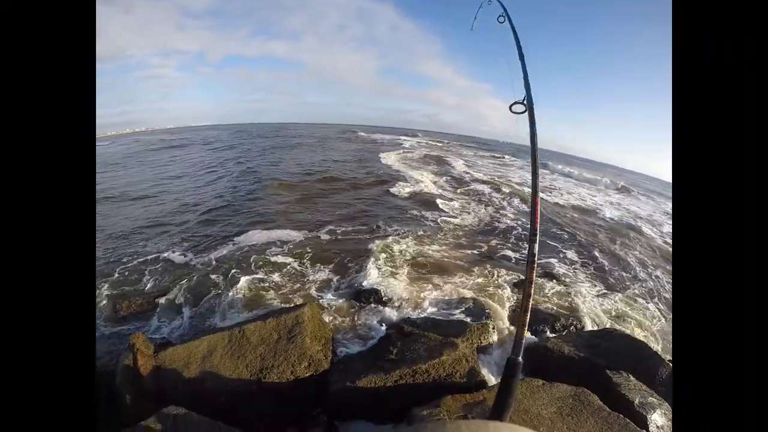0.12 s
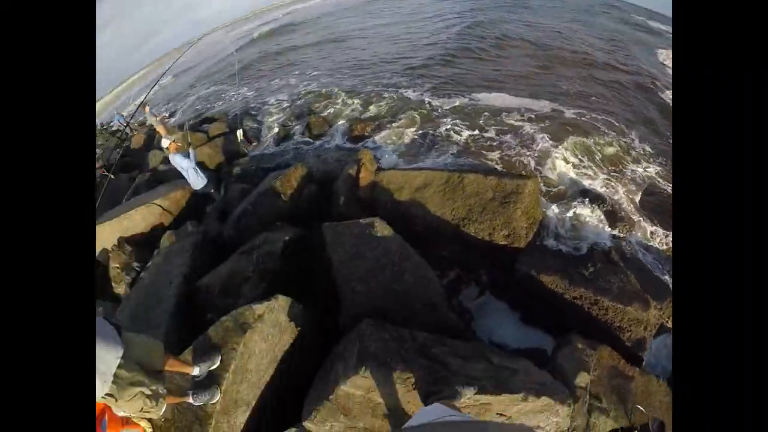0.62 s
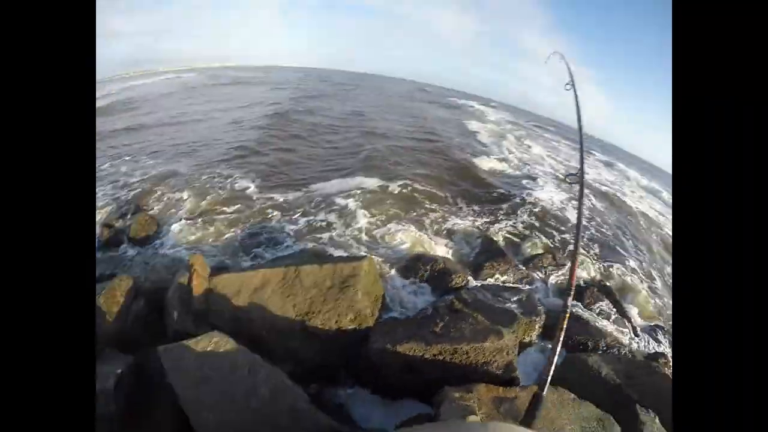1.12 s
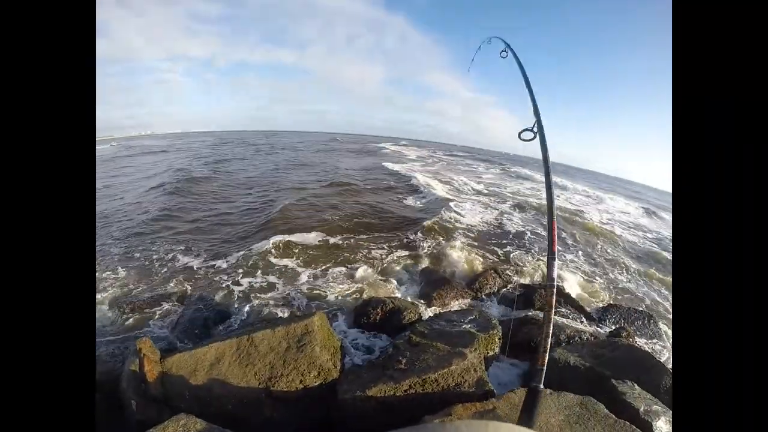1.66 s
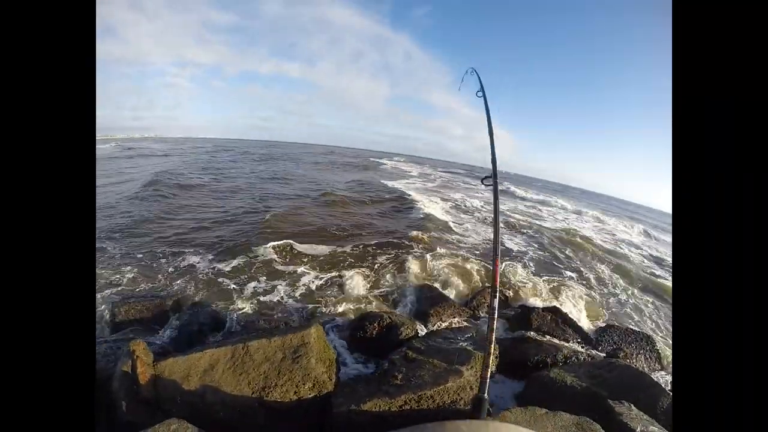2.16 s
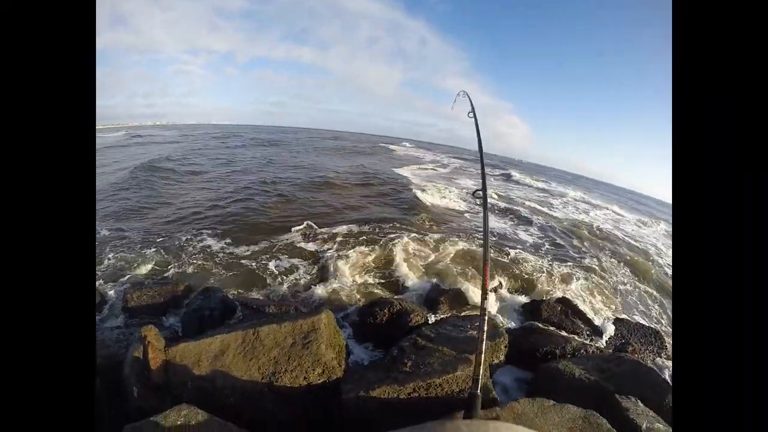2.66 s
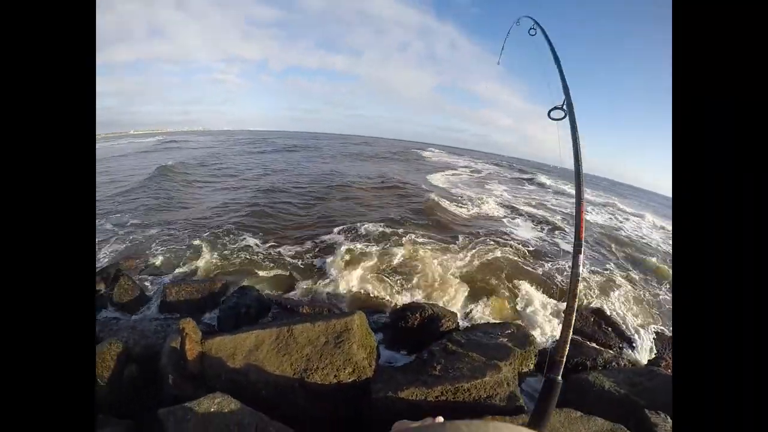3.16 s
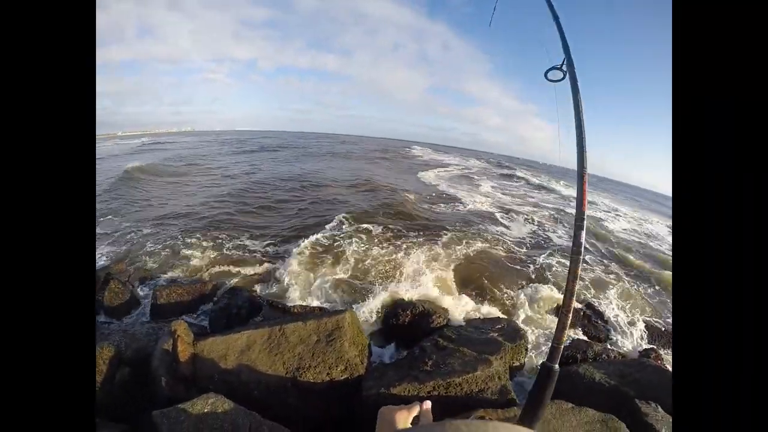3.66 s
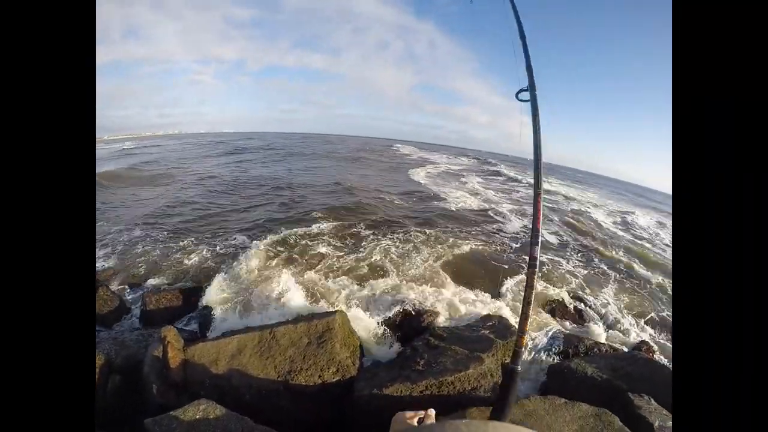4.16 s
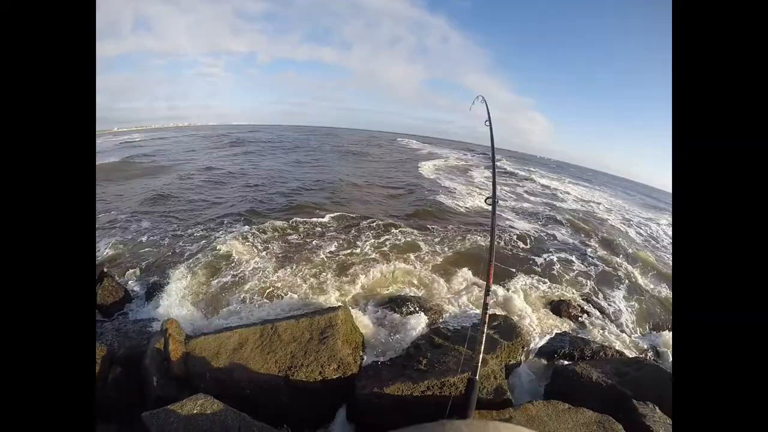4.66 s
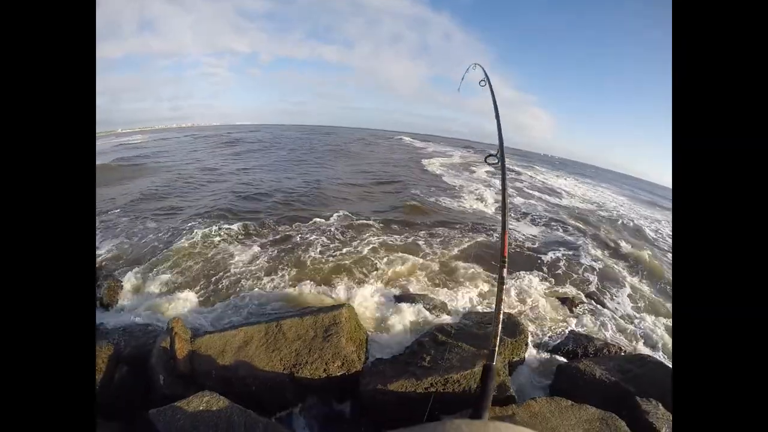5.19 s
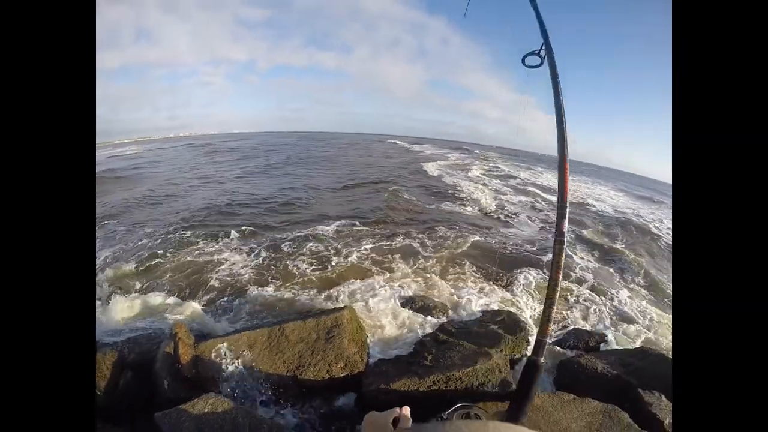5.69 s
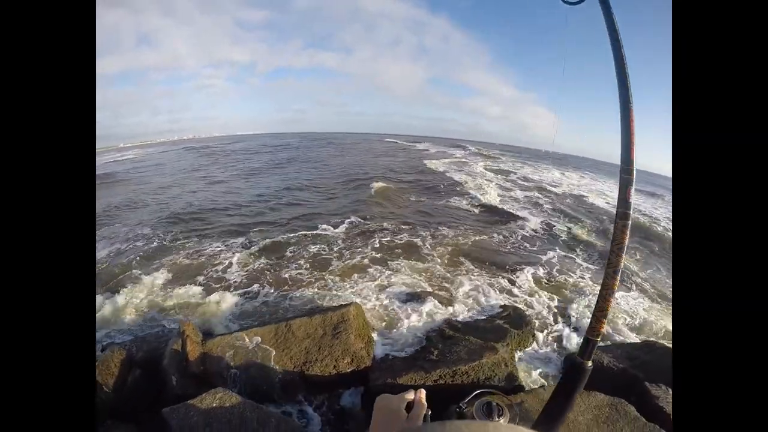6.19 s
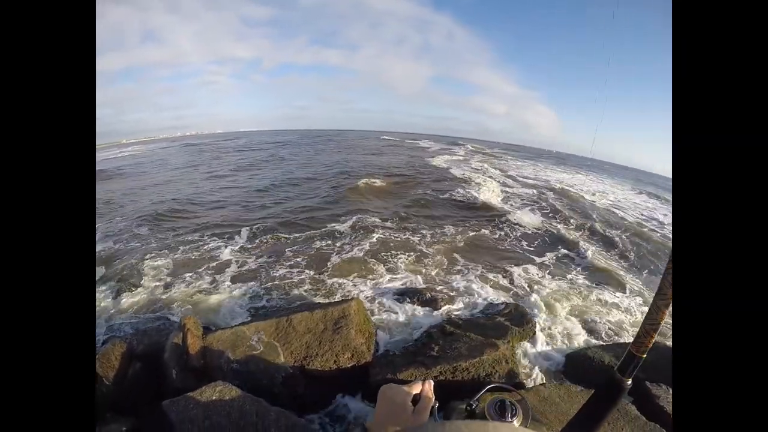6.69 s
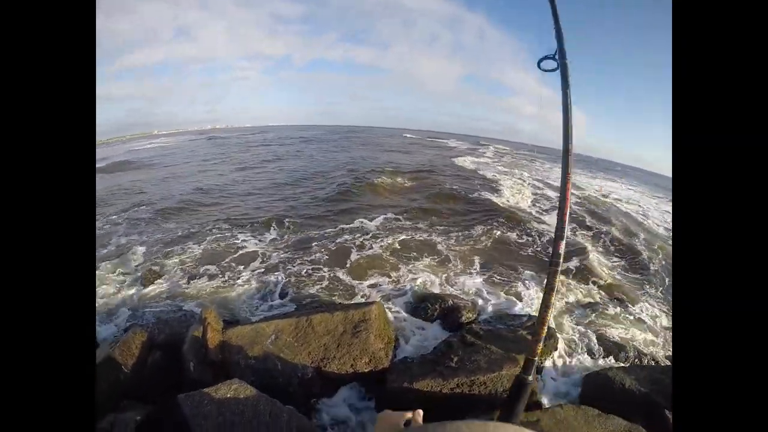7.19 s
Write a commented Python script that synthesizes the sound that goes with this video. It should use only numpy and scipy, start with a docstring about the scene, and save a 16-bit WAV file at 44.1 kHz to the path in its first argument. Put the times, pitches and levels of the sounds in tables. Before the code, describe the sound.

Outdoors on a rocky shore, a microphone inside a plastic housing picks up steady churning water with resonant, papery colour and faint hiss. Irregular deep gusts bump the case. Tiny squeaky chirps from a fishing reel appear in two clusters, low gulps of water between rocks. The surf grows, peaks past the middle, thins out, then one scratchy rising squeak closes it.

```python
"""Surf breaks and drains over jetty rocks throughout, heard through a camera's sealed plastic case.
Noise bands make rumble, slosh and foam; lumpy low noise is the wind buffeting the case; hiss is steady.
The camera tips down at 0.45-1.13 s; gliding tones are reel chirps at 0.6-2.2 s and 4.2-4.7 s, and a few
water gulps from 1.1 s to 4.7 s. The treble drops out briefly near 0.4, 0.8, 2.1, 2.4 and 6.4-6.8 s.
From 6.9 s the reel squeals once, a stick-slip tone of three rising partials."""
import sys
import numpy as np
from scipy import signal
from scipy.io import wavfile
from scipy.ndimage import uniform_filter1d

SR = 44100
rng = np.random.default_rng(int(sys.argv[2]) if len(sys.argv) > 2 else 0)


def waveform_to_disk(signal):
    """Save audio, clipped to [-1, 1], as 16-bit WAV at the path in sys.argv[1]."""
    frames = np.transpose(np.atleast_2d(signal))
    scaled = np.clip(frames, -1, 1) * 32767
    samples = np.round(scaled).astype(np.int16)
    wavfile.write(sys.argv[1], SR, samples)


def magnitude_from_level(level_db):
    """Linear magnitude for a level in decibels (20 dB per decade)."""
    exponent = np.asarray(level_db, float) / 20
    return 10 ** exponent


N = 323076


def evened(x):
    """Scales to rms 1."""
    return x / np.sqrt(np.mean(x ** 2) + 1e-20)


def column(table, index, t):
    """Interpolates one column of a curve at times t."""
    return np.interp(t, [row[0] for row in table], [row[index] for row in table])


def bump(middle, width, x):
    """Bell-shaped rise and fall; width is between the 1/e points."""
    return np.exp(-(2 * (x - middle) / width) ** 2)


def noise(colour, size, patchy_db, patch_hz, patch_s, flicker_db, shape_db=lambda hz, t: 0):
    """Random short-time spectra with drifting patches and a flicker shared by all pitches."""
    hop = size // 4
    hz = np.fft.rfftfreq(size, 1 / SR)[:, None]
    t = np.arange(N // hop + 5) * hop / SR
    real, imaginary, patches = rng.standard_normal((len(t), len(hz), 3)).T
    patch_frames = 1 + int(patch_s * SR / hop)
    patches = uniform_filter1d(patches, 1 + int(patch_hz * size / SR), 0)
    patches = evened(uniform_filter1d(patches, patch_frames, 1))
    flicker = evened(uniform_filter1d(rng.standard_normal(len(t)), patch_frames))
    colour_hz, colour_db = np.transpose(colour)
    base_db = np.interp(np.log(hz + 1), np.log(colour_hz), colour_db)
    field_db = base_db + patchy_db * patches + flicker_db * flicker
    rms = np.sqrt(np.mean(magnitude_from_level(field_db) ** 2))  # taken before shape_db, which thus sets the level
    spectra = (real + 1j * imaginary) * magnitude_from_level(field_db + shape_db(hz, t)) / rms
    return signal.istft(spectra, nperseg=size, noverlap=size - hop)[1][:N] / np.sqrt(3 * size / 4)


def gliding_tones(rows, waver):
    """Short gliding sines with soft ends; waver is the rms pitch jitter as a fraction."""
    out = np.zeros(N)
    jitter = evened(uniform_filter1d(rng.standard_normal(N), size=150))
    for start_s, length_s, start_hz, end_hz, db in rows:
        start, count = int(start_s * SR), int(length_s * SR)
        hz = np.linspace(start_hz, end_hz, count) * (1 + waver * jitter[start:][:count])
        tone = np.sin(2 * np.pi * np.cumsum(hz) / SR)
        out[start:][:count] += np.sqrt(2) * magnitude_from_level(db) * tone * np.hanning(count)
    return out


# Microphone noise spectrum. Each row: frequency in Hz, relative density in dB per Hz.
HISS_COLOUR = [(4000, -32), (8000, -6), (12000, -1.5), (15500, -1.5)]
HISS_DB = -71.5


def hiss():
    """Steady broadband noise of the microphone."""
    raw = noise(HISS_COLOUR, size=512, patchy_db=0.8, patch_hz=900, patch_s=0.02, flicker_db=1.0)
    return magnitude_from_level(HISS_DB) * evened(raw)


# Slowly changing wind under the gusts. Each row: time in seconds, level in dB, sharpness in dB per octave.
SLOW_WIND = [(0, -29, -5), (.35, -41, 1), (.6, -38.5, -1.7), (1.3, -32.5, -3.5), (1.6, -31.5, -2),
             (2.05, -34.5, -0.3), (2.4, -35.5, -1.5), (3, -30.5, 2), (3.4, -36.5, -0.2), (3.8, -33.5, 1.5),
             (4.25, -38, 4), (4.9, -34, 4), (5.25, -37, 2.5), (5.6, -33, -0.3), (6, -32.5, -0.5),
             (6.4, -40.5, -1.5), (6.8, -41, 5.5), (7.05, -28, 3.5), (7.33, -31, -0.5)]
# Gusts thumping the case. Each row: peak in seconds, length in seconds, level in dB.
GUSTS = [(0.093, 0.092, -24), (0.348, 0.072, -32.5), (0.535, 0.16, -27), (0.711, 0.036, -25.5),
         (0.847, .1, -28.5), (0.985, 0.042, -20), (1.158, 0.093, -23), (1.418, .06, -24.5),
         (1.636, 0.19, -31), (2.193, 0.093, -26), (2.313, 0.12, -26.5), (2.5, 0.11, -22), (2.697, .06, -31),
         (2.97, 0.075, -29.5), (3.18, 0.044, -28.5), (3.386, 0.041, -33), (3.848, 0.047, -30),
         (3.98, .06, -28.5), (4.1, .07, -34), (4.42, 0.04, -28.5), (4.516, 0.048, -28.5), (4.66, .1, -29),
         (4.926, 0.061, -26.5), (5.06, 0.17, -32), (5.336, .07, -23), (5.41, 0.054, -24.5),
         (5.547, 0.13, -25), (5.723, .06, -36.5), (5.928, 0.082, -30), (6.125, 0.055, -27.5),
         (6.26, 0.055, -38), (6.477, .1, -36), (6.74, 0.045, -33.5), (7.05, 0.03, -26), (7.193, .08, -29.5)]


def wind_db(t):
    """Powers of slow wind and gusts add."""
    power = magnitude_from_level(column(SLOW_WIND, 1, t)) ** 2
    power = power + sum(magnitude_from_level(db) ** 2 * bump(s, length_s, t) ** 2 for s, length_s, db in GUSTS)
    return 10 * np.log10(power)


# Wind pressure spectrum. Each row: frequency in Hz, relative density in dB per Hz.
WIND_COLOUR = [(8, -6), (20, 2), (45, -0.5), (80, -9), (150, -22.5), (400, -77), (3000, -130)]
USUAL_WIND_DB = -31.5
DULLING = -0.35  # dB per octave for each dB of wind above the usual


def wind(t, steadied=0.75):
    """Lumpy pressure on the case; the gusts, more than chance, set its strength."""
    def shape_db(hz, s):
        tilt = column(SLOW_WIND, 2, s) + DULLING * (wind_db(s) - USUAL_WIND_DB)
        return tilt * np.clip(np.log2((hz + 1) / 35), -1, 2)

    lumps = evened(noise(WIND_COLOUR, size=4096, patchy_db=0.5, patch_hz=30, patch_s=0.08,
                         flicker_db=1.2, shape_db=shape_db))
    power = uniform_filter1d(uniform_filter1d(lumps ** 2, size=1500), size=1500)
    # dividing by a power of the smoothed power flattens chance swells
    return magnitude_from_level(wind_db(t)) * evened(lumps / (power + 0.09) ** (steadied / 2))


# Reel chirps. Each row: start in seconds, length in seconds, start in Hz, end in Hz, mid-tone rms in dB.
CHIRPS = [(.6, .025, 2260, 2220, -52), (.672, 0.055, 1360, 1330, -51), (.81, 0.037, 1286, 1250, -48),
          (.818, 0.026, 2280, 2340, -48), (.864, 0.039, 2300, 2250, -51), (1.338, 0.033, 1740, 1750, -54),
          (1.773, .03, 4990, 4960, -58), (1.828, 0.055, 4950, 5030, -56), (1.95, 0.027, 1860, 1960, -55),
          (1.964, 0.036, 2260, 2270, -51), (1.988, 0.046, 1670, 1500, -48), (2.018, 0.058, 1390, 1220, -48),
          (2.072, 0.023, 1350, 1370, -47), (2.037, 0.027, 3960, 3940, -47.5),
          (2.138, 0.035, 2250, 2220, -48), (2.194, 0.032, 2500, 2470, -51), (2.2, .035, 1290, 1340, -45),
          (2.17, 0.028, 2260, 2260, -54), (1.93, 0.037, 2470, 2630, -53), (4.214, .035, 1810, 1820, -52),
          (4.274, 0.044, 2530, 2530, -45.5), (4.358, 0.033, 2190, 2170, -49),
          (4.565, .045, 1305, 1420, -51), (4.59, 0.044, 1430, 1260, -55), (4.644, 0.027, 2860, 2840, -54),
          (4.66, .03, 1290, 1310, -45)]


def chirps():
    """The reel chirps while wound: short, unsteady gliding tones."""
    return gliding_tones(CHIRPS, waver=0.036)


# Long squeal. Each row: time in seconds, slip rate in Hz, grip in dB.
SQUEAL = [(6.945, 782, -70), (6.962, 880, -51), (6.975, 1120, -46), (6.993, 1400, -52), (7.004, 1534, -46),
          (7.018, 1740, -48), (7.035, 1860, -44), (7.06, 1870, -57), (7.08, 1770, -55), (7.1, 1820, -62),
          (7.115, 1850, -55), (7.14, 1870, -60), (7.155, 2170, -50), (7.172, 2225, -48), (7.185, 2200, -58),
          (7.21, 2330, -49), (7.222, 2210, -52), (7.236, 2215, -50), (7.25, 2370, -51), (7.272, 2325, -47),
          (7.29, 2480, -54), (7.3, 2600, -68)]
# Brief slip inside the squeal. Each row: time in seconds, slip rate in Hz, grip in dB.
SLIP = [(7.035, 2060, -70), (7.052, 2120, -43), (7.068, 2150, -70)]
# Response of the reel's body. Each row: frequency in Hz, gain in dB.
REEL_COLOUR = [(800, -20), (1500, 0), (1900, 0), (2250, -14), (2450, -9), (2800, 0), (3150, -16),
               (3700, -14), (4400, 2), (5000, 1), (5400, -9), (6700, 0), (7800, -8)]
# Gains of partials 1 to 3 in dB.
PARTIAL_DB = (0, -3, -21)


def squeal(rows, t, waver=0.016, grain_db=3.5):
    """Stick and slip at an unsteady rate and grip sounds three partials through the reel's body."""
    jitter, *grain = (evened(uniform_filter1d(v, size=200)) for v in rng.standard_normal((4, N)))
    slip_hz, grip_db = column(rows, 1, t), column(rows, 2, t)
    body_hz, body_db = np.transpose(REEL_COLOUR)
    turns = np.cumsum(slip_hz * (1 + waver * jitter)) / SR
    out = np.zeros(N)
    for k in range(3):
        through_body_db = np.interp(np.log((k + 1) * slip_hz), np.log(body_hz), body_db)
        db = grip_db + PARTIAL_DB[k] + through_body_db + grain_db * grain[k]
        out += np.sqrt(2) * magnitude_from_level(db) * np.sin(2 * np.pi * (k + 1) * turns)
    return out * ((t > rows[0][0]) & (t < rows[-1][0]))


# Low water gulps. Each row: start in seconds, length in seconds, start in Hz, end in Hz, mid-tone rms in dB.
GULPS = [(1.147, .06, 620, 554, -51), (1.195, 0.072, 514, 415, -45.5), (3.16, 0.11, 135.3, 132, -30),
         (3.94, 0.061, 229, 215, -37), (4.57, .08, 219, 212, -35)]


def gulps():
    """Low gulps of water: short, unsteady gliding tones."""
    return gliding_tones(GULPS, waver=0.064)


# The wave. Each row: time in seconds, strength in dB, share of foam against heavy water in dB,
# foam brightness in dB per octave.
SURF = [(0, -3, 0, 2), (.35, -4.5, -0.5, .9), (.6, -3, -0.5, 1), (.9, -1.5, -0.5, -0.2),
        (1.12, -2, 0.5, -0.5), (1.26, -1.7, 0, 2), (1.5, -1, -0.5, 1), (1.9, -2, 0.5, 1),
        (2.1, -1, .5, -0.7), (2.4, 0.8, 1.5, -0.5), (2.9, 1, 1, 0.3), (3.3, 0.5, 1.1, 0.3),
        (3.7, .5, 0.2, 1.1), (4.2, 1.5, 1, 0.8), (4.6, 4, 0.5, 0.2), (5, 0.5, 0.5, 2.1),
        (5.25, 1.5, -1, 1.6), (5.55, -3.5, -1, 2), (5.9, -1.5, -1.5, 3), (6.4, -3, -1, 2),
        (6.8, -5, -1.5, 2), (7.33, -2.5, -2, 0)]
# Brief swells and dips of the surf. Each row: middle in seconds, length in seconds, change in dB.
SWELLS = [(1.215, 0.054, 4.5), (1.383, 0.13, 2), (2.017, 0.12, 1.5), (2.987, 0.046, 1.5),
          (3.742, 0.074, 1.5), (3.96, 0.072, 7), (4.6, 0.061, 2.5), (5.108, 0.038, 5), (2.5, 0.17, 1),
          (2.88, .08, 1.5), (3.183, .08, -0.5), (4.305, 0.089, -1), (5.76, 0.16, 1), (6.21, 0.047, 2.5),
          (6.388, 0.045, 2.5), (6.69, 0.06, 3)]
# levels at zero strength and foam share, foam and slosh before the wash gain and colouring
RUMBLE_DB, SLOSH_DB, FOAM_DB = -36, -47, -49
RUMBLE_FOLLOWS, SLOSH_FOLLOWS = 0.93, 0.54  # dB per dB of strength
RUMBLE_YIELDS, SLOSH_YIELDS = -1.86, 0.015  # dB per dB of foam share
SWELL_IN_FOAM = 0.13  # dB per dB of swell


def surf_db(t):
    """Rumble, slosh and foam levels follow the wave and its brief swells; foam tilt follows the wave."""
    strength, foamy = column(SURF, 1, t), column(SURF, 2, t)
    swell = sum(db * bump(s, length_s, t) for s, length_s, db in SWELLS)
    rumble_db = RUMBLE_DB + RUMBLE_FOLLOWS * strength + RUMBLE_YIELDS * foamy + swell
    slosh_db = SLOSH_DB + SLOSH_FOLLOWS * strength + SLOSH_YIELDS * foamy + swell
    foam_db = FOAM_DB + strength + foamy + SWELL_IN_FOAM * swell
    return rumble_db, slosh_db, foam_db, column(SURF, 3, t)


# Rumble spectrum. Each row: frequency in Hz, relative density in dB per Hz.
RUMBLE_COLOUR = [(30, -37), (70, -6.5), (130, 0), (250, -6), (400, -18), (600, -32), (1500, -67),
                 (6000, -120)]


def rumble(t):
    """Dull roar of water falling between the rocks."""
    roar = noise(RUMBLE_COLOUR, size=2048, patchy_db=0.73, patch_hz=80, patch_s=0.089, flicker_db=1.12)
    return magnitude_from_level(surf_db(t)[0]) * evened(roar)


# Peaks and notches of the sealed case. Each row: frequency in Hz, width in Hz, gain in dB.
CASE = [(987, 370, 7), (936, 100, 2), (2470, 124, -3.5), (1766, 305, -4.5), (2500, 530, 9),
        (3040, 180, -1.5), (3297, 500, 4.5), (3500, 240, -6.5), (3880, 550, 7), (4536, 445, 6),
        (5676, 750, 8), (6230, 250, 2.5), (6930, 990, 7), (8440, 720, -0.5), (10480, 1500, 4),
        (11260, 500, -4), (12500, 1100, 1)]


def case_db(hz):
    """Colour of the case: bell-shaped peaks and notches."""
    return sum(db * bump(f, width_hz, hz) for f, width_hz, db in CASE)


# Wash colour while tipped. Each row: frequency in Hz, width in Hz, gain in dB.
TIPPED_COLOUR = [(1750, 600, 3.5), (2900, 520, 2), (4450, 1500, -4.5)]
TIP_START_S, TIP_END_S, TURN_S = 0.45, 1.13, 0.14


def tipped_db(hz, t):
    """Tipping the camera toward the rocks shades some of the wash and opens other parts."""
    down = np.clip(np.minimum(t - TIP_START_S, TIP_END_S - t) / TURN_S + 0.5, 0, 1)
    return down * sum(db * bump(f, width_hz, hz) for f, width_hz, db in TIPPED_COLOUR)


# Wash spectrum. Each row: frequency in Hz, relative density in dB per Hz.
WASH_COLOUR = [(150, 5), (400, -2.5), (1000, 1), (2500, -5.5), (4800, -8), (5400, -21), (8000, -19),
               (9000, -24), (15500, -31)]


def wash():
    """Slosh below and bursting foam above, both heard through the case."""
    def shape_db(hz, s):
        octaves = np.log2((hz + 1) / 1700)
        foam = np.clip(octaves / 4.8 + 0.5, 0, 1)
        _, slosh_db, foam_db, tilt_db = surf_db(s)
        water_db = (1 - foam) * slosh_db + foam * foam_db
        bright_db = tilt_db * np.clip(octaves - 1.1, 0, 1.5)
        return case_db(hz) + tipped_db(hz, s) + water_db + bright_db

    return magnitude_from_level(4.5) * noise(WASH_COLOUR, size=1024, patchy_db=1.0, patch_hz=500, patch_s=0.04,
                            flicker_db=0.12, shape_db=shape_db)


def scene():
    """Hiss, wind, reel and surf in one channel."""
    t = np.arange(N) / SR
    reel = chirps() + squeal(SQUEAL, t) + squeal(SLIP, t)
    surf = gulps() + rumble(t) + wash()
    return (hiss() + wind(t) + reel + surf)[None]


# Treble dropouts. Each row: middle in seconds, length in seconds.
DROPOUTS = [(.375, .015), (.805, .017), (2.113, .036), (2.424, .015), (6.371, .013), (6.498, .014),
            (6.669, .015), (6.786, .036)]


def dropouts(x):
    """Briefly mutes 480-14800 Hz, sparing 780-1500 Hz and the case's strongest peaks below 4800 Hz."""
    hz, t, spectra = signal.stft(x, SR, nperseg=512, noverlap=448)
    strong = (case_db(hz) > 4.6) | ((hz > 780) & (hz < 1500))
    weak = (hz > 480) & (hz < 14800) & ((hz > 4800) | ~strong)
    lost = sum(np.clip((length_s / 2 - abs(t - s)) / 0.012 + 0.5, 0, 1) for s, length_s in DROPOUTS)
    return signal.istft(spectra * (1 - weak[:, None] * lost), SR, nperseg=512, noverlap=448)[1][:, :N]


def low_pass(x):
    """Removes everything above the highest recorded frequency."""
    return signal.sosfilt(signal.butter(12, 16350, fs=SR, output="sos"), x)


def record(dry):
    """Dropouts, then a steep low-pass at the band limit."""
    lowpass = signal.firwin(1023, 15260, window=("kaiser", 8), fs=SR)  # Hz
    mix = signal.oaconvolve(dropouts(dry), lowpass[None], "same")
    return low_pass(mix)


dry = scene()
out = record(dry)
waveform_to_disk(out)
```